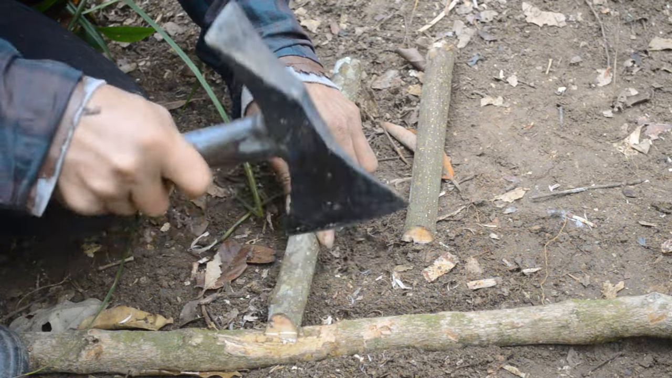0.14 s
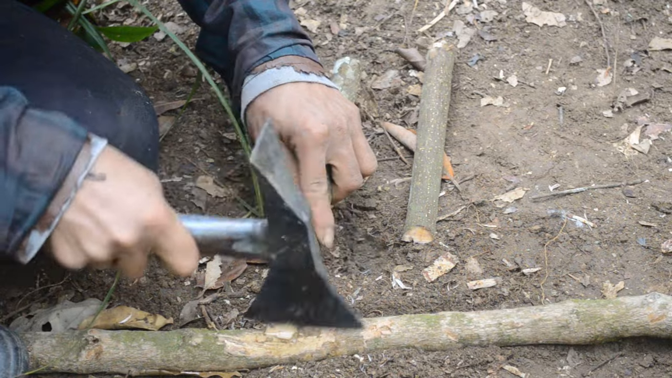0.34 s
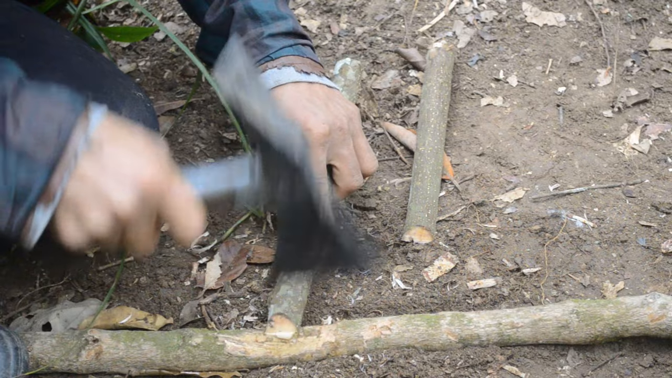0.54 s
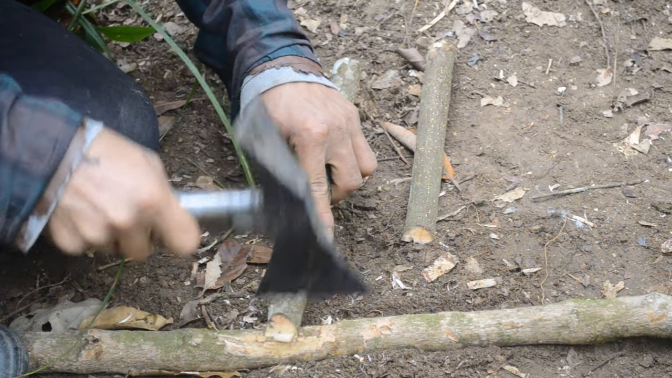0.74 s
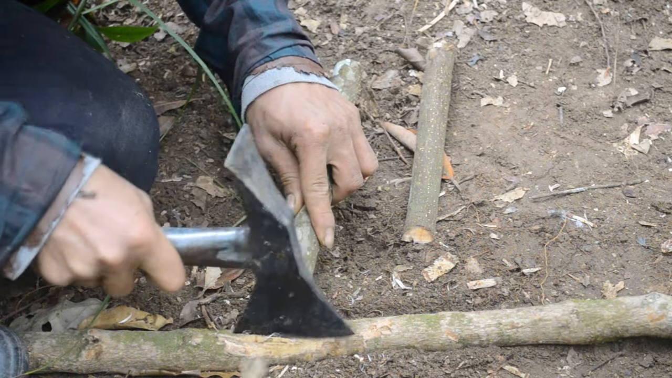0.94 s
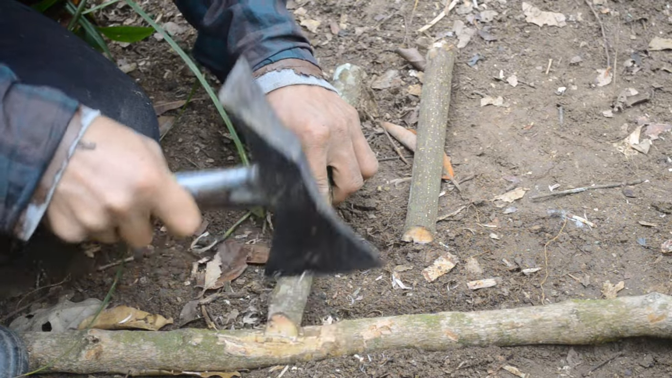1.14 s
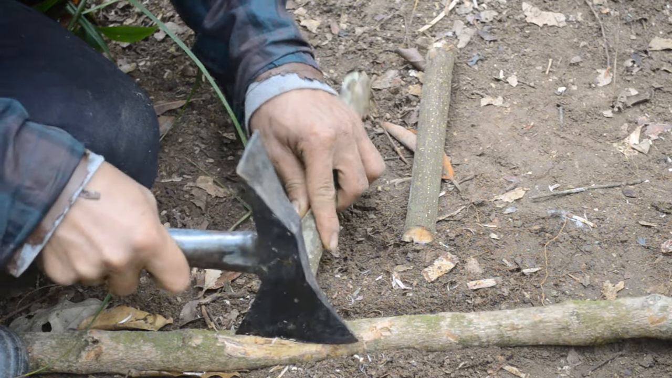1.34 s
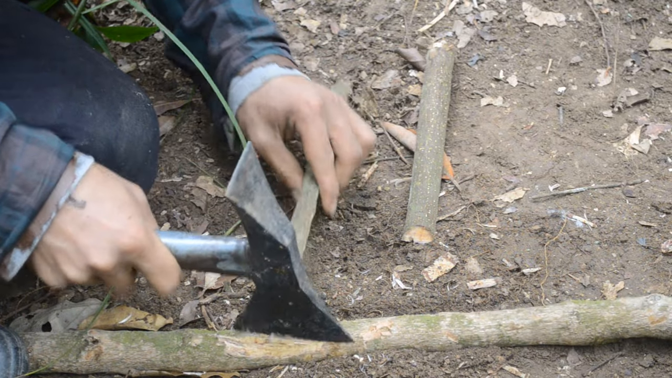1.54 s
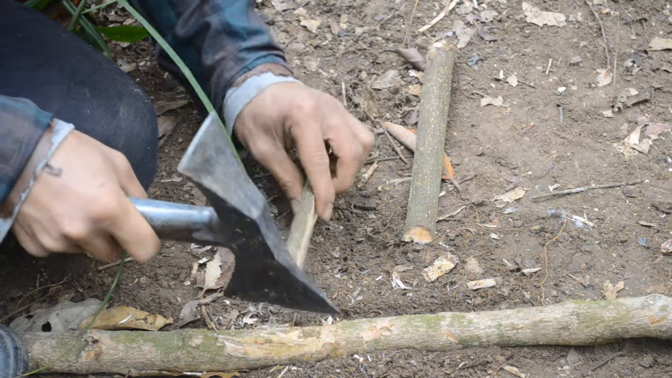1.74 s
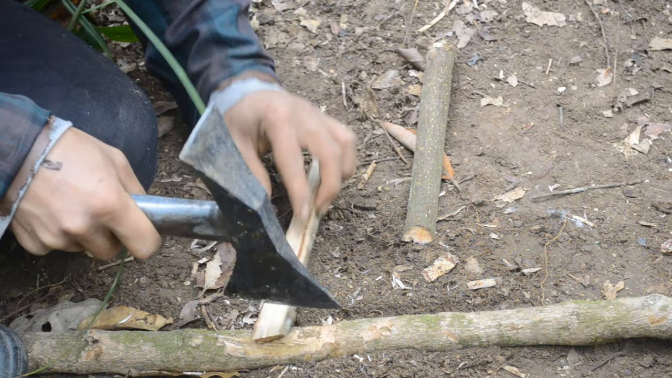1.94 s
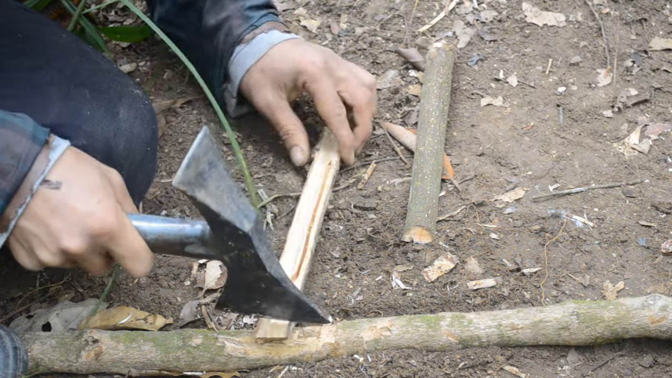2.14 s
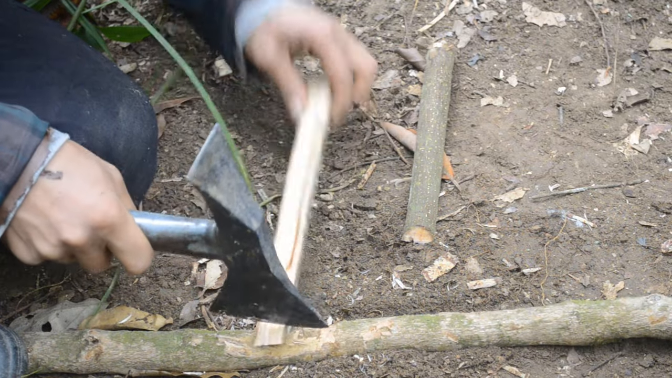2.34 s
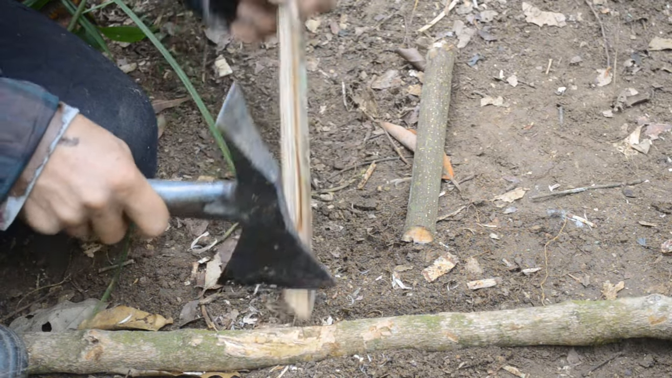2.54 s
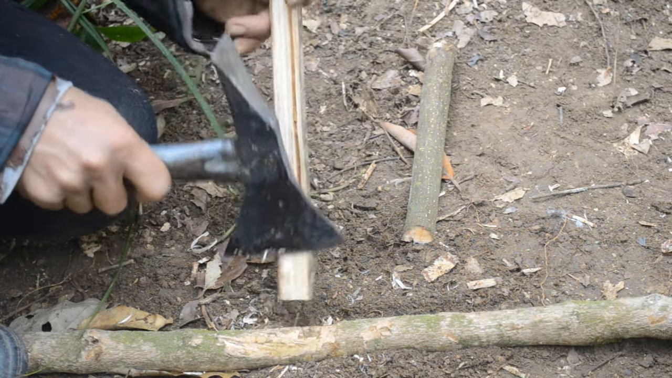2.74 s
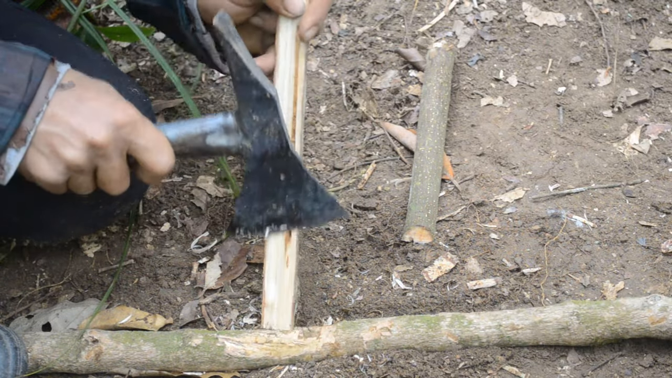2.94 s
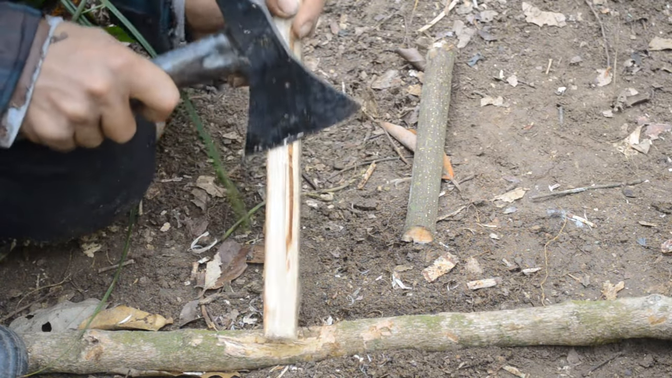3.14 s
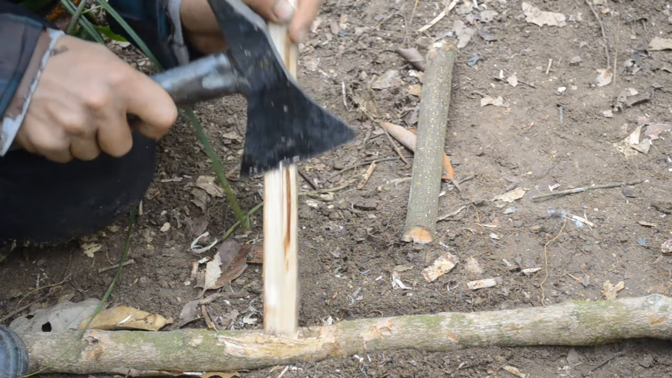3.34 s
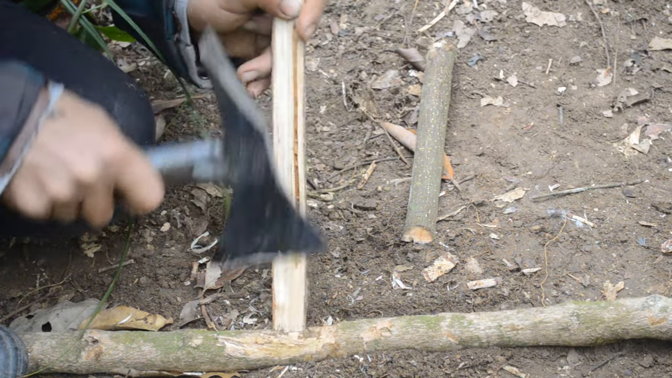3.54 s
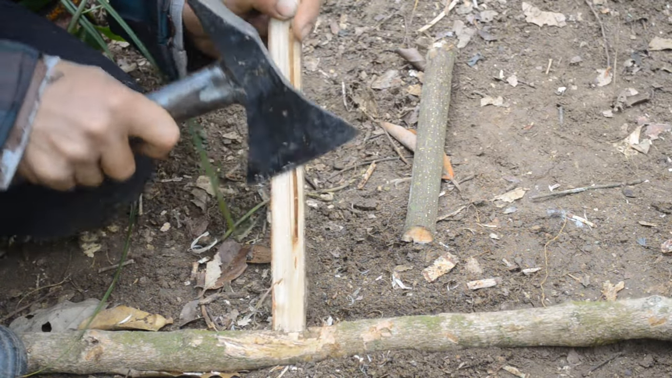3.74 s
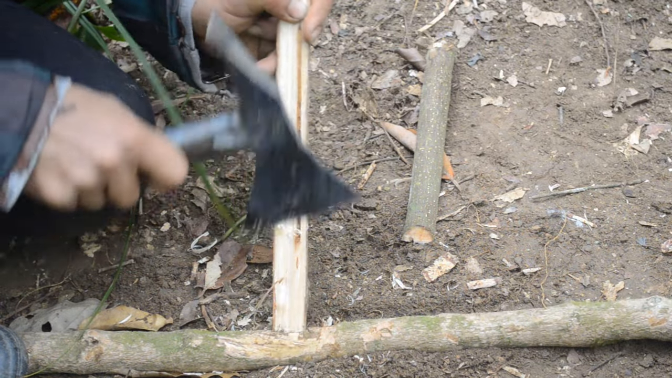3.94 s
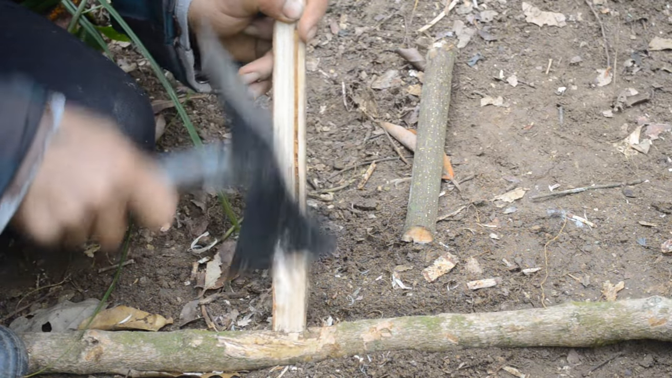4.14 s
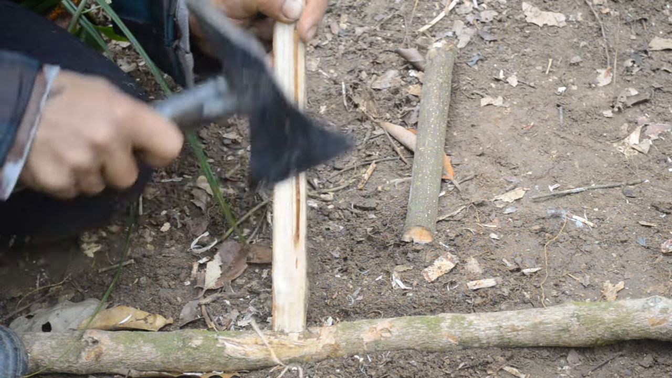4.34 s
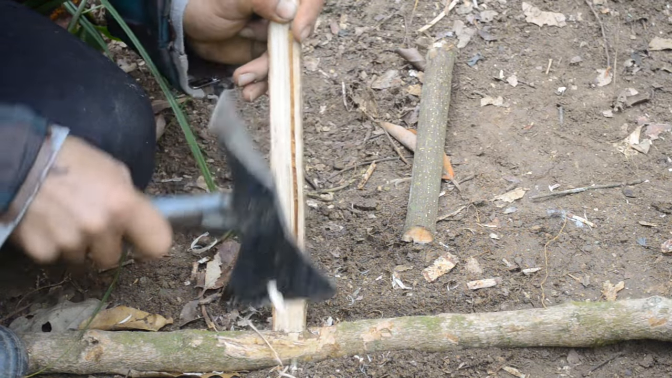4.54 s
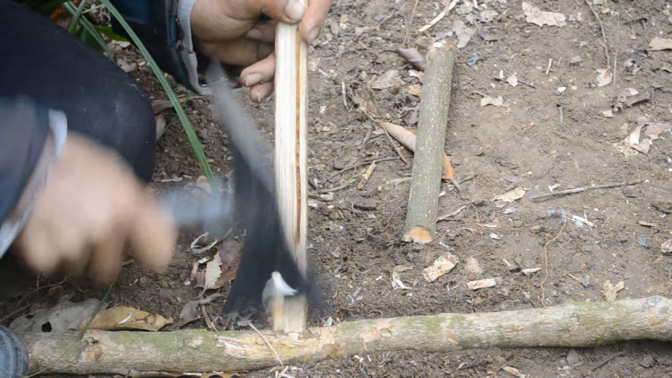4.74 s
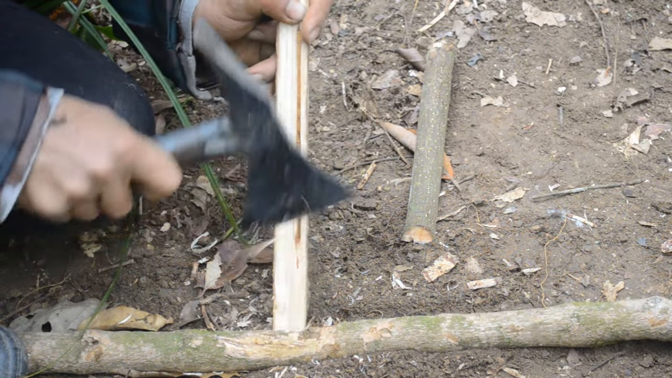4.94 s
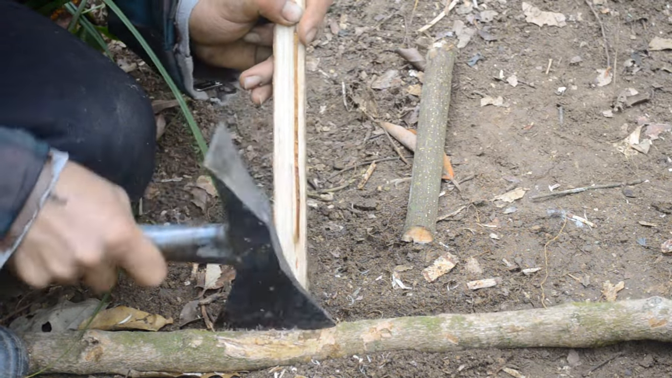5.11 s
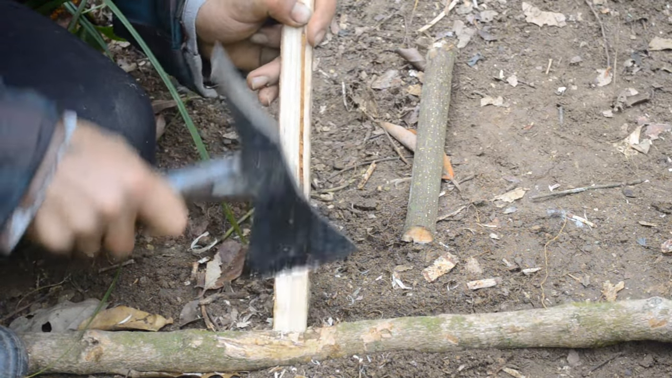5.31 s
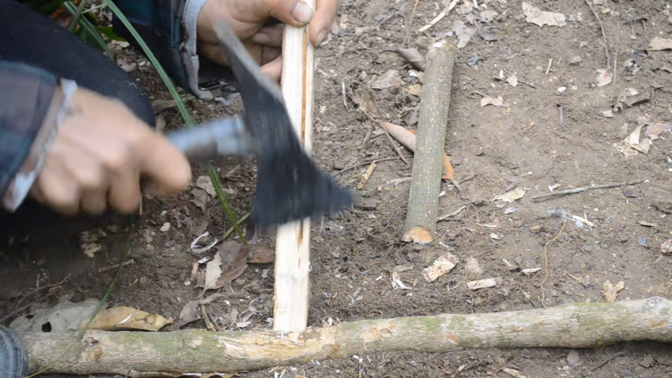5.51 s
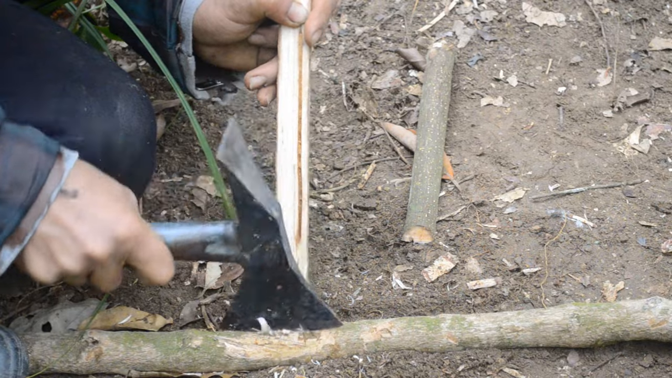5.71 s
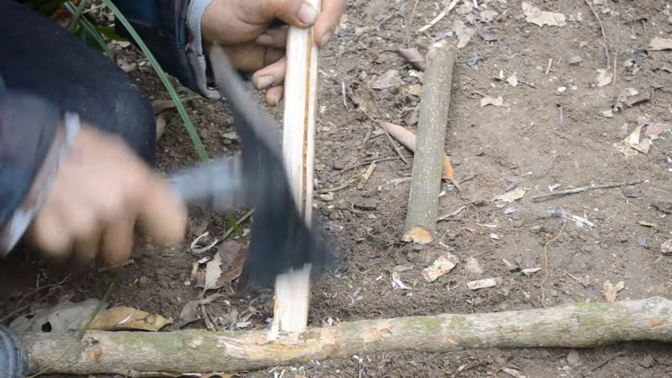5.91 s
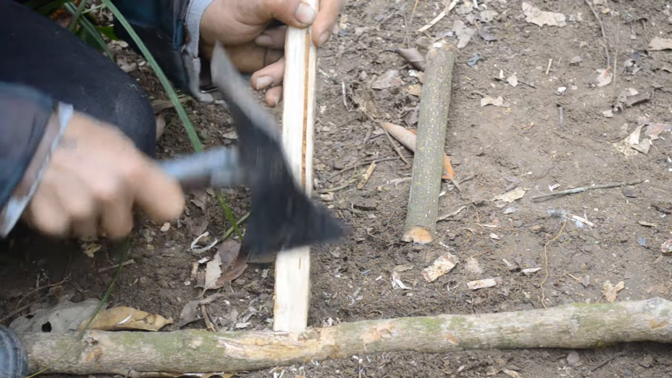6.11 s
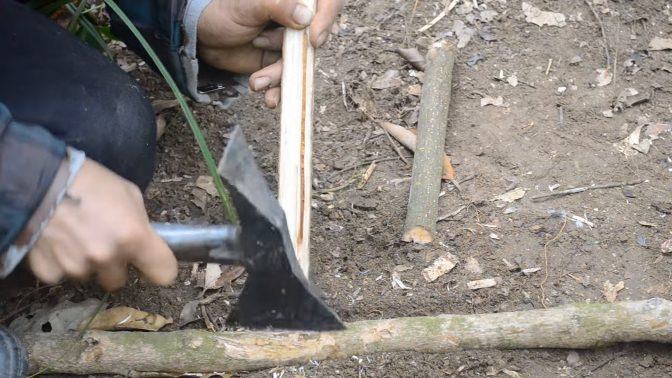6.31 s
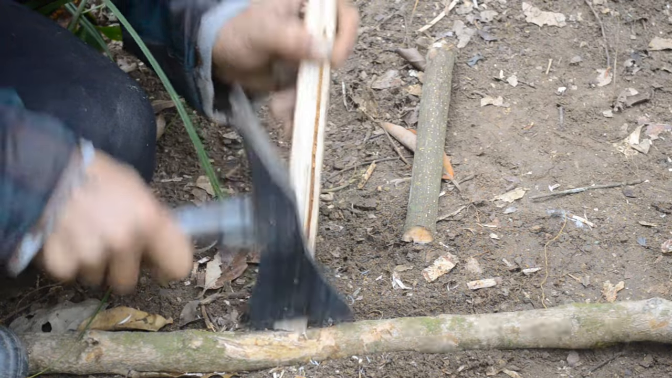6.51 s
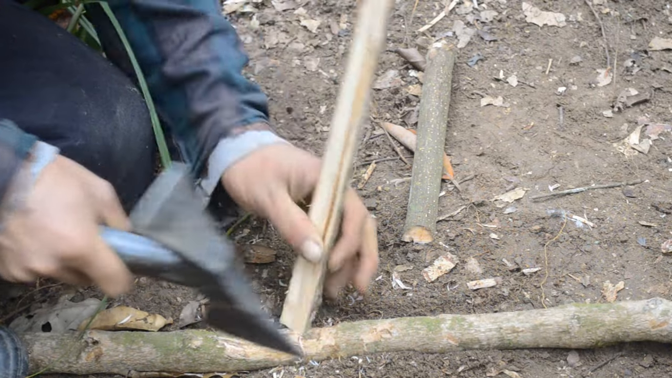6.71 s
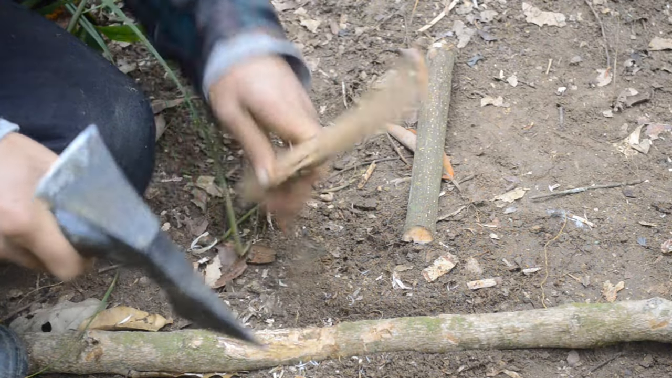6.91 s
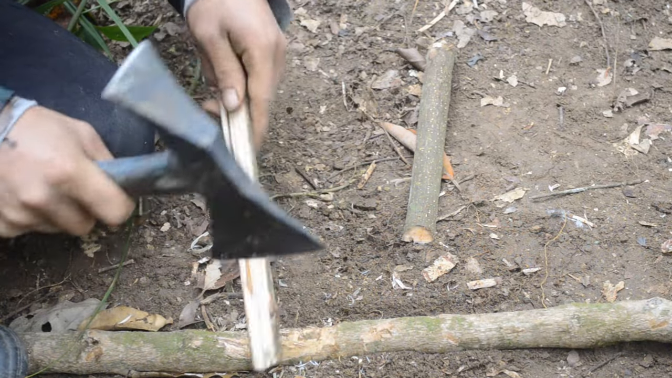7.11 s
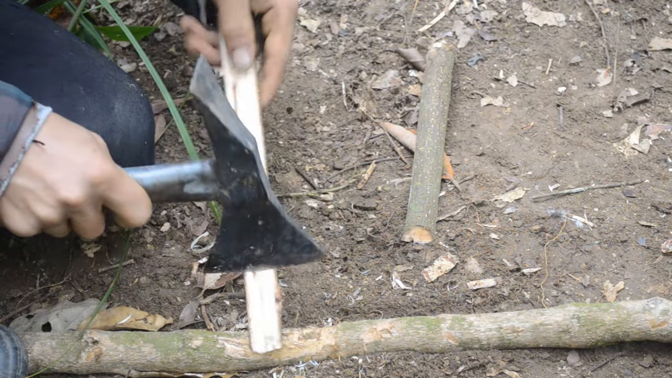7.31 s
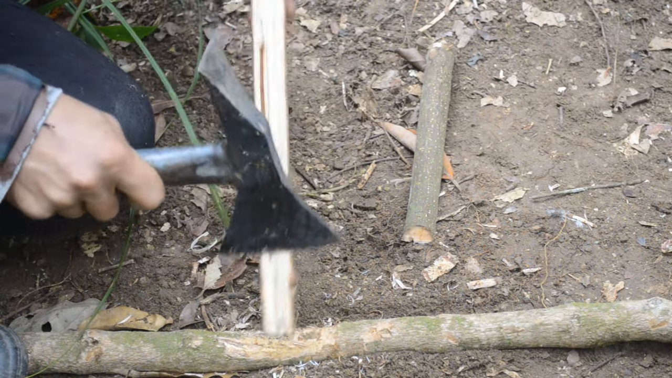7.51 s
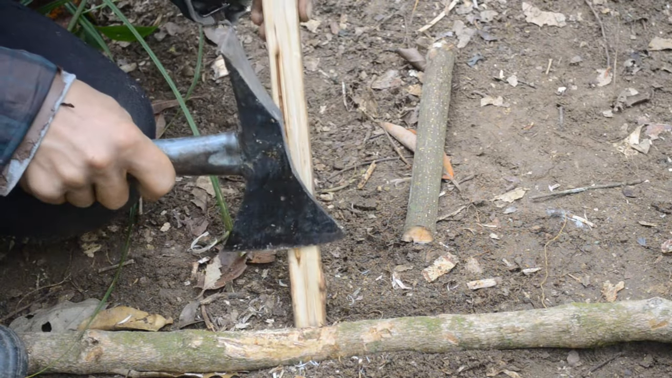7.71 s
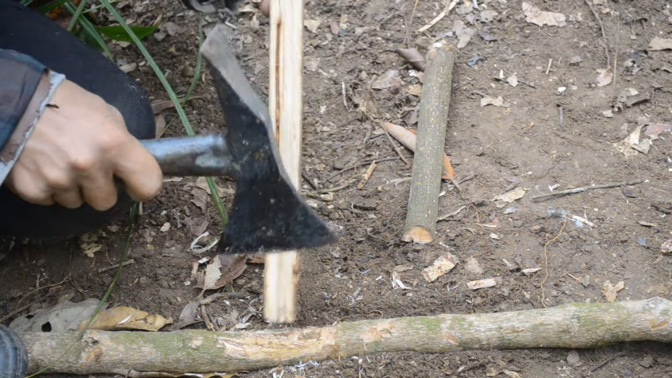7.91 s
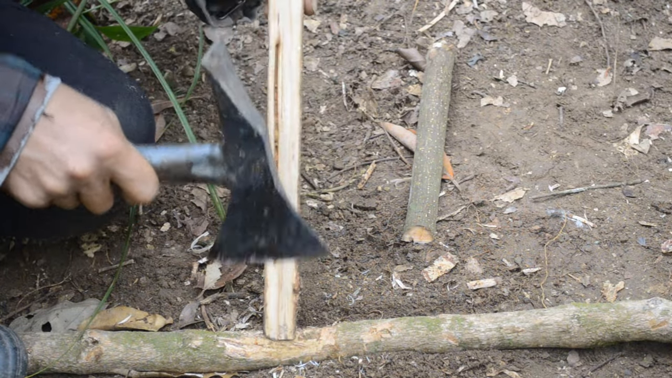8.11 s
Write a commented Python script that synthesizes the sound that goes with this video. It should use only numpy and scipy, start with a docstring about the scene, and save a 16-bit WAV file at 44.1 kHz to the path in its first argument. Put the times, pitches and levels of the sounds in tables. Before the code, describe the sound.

A small hatchet chops a dry stick against a log, then scrapes and shaves it with dull thuds, over faint forest air.

```python
"""A hatchet splits a dry stick against a log with a few close chops, then shaves down it, thuds into the
log and scrapes back up. Each impact crushes wood, shoves the log and excites the hatchet's modes;
stick-slip friction makes the blade sing and the fibres tear. Dry litter snaps, something knocks far
off, and the freed stick buzzes and later clacks on the blade. The trees scatter it all softly,
over forest air, a distant drone and a very faint, high whine."""
import sys
import numpy as np
from scipy import signal
from scipy.fft import rfft, irfft, next_fast_len
from scipy.io import wavfile
from scipy.ndimage import map_coordinates

SR = 44100
rng = np.random.default_rng(int(sys.argv[2]) if len(sys.argv) > 2 else 0)


def pcm_store(signal):
    """Save signal as 16-bit PCM."""
    levels = np.round(np.clip(np.atleast_2d(signal), -1, 1) * 32767)
    wavfile.write(sys.argv[1], SR, levels.astype(np.int16).T)


N = 359856
T = np.arange(SR // 2) / SR  # seconds within one event
TIME = np.arange(N) / SR  # seconds within the scene


def amp(db):
    """Decibels to amplitude."""
    return 10 ** (np.asarray(db) / 20)


def unit(x):
    """Scale to rms 1."""
    return x / np.sqrt(np.mean(x ** 2) + 1e-20)


def along(points, hz):
    """Interpolate (Hz, value) points on a log frequency axis."""
    f, v = np.transpose(points)
    return np.interp(np.log(hz + 1), np.log(f + 1), v)


def add(track, s, sound):
    """Superpose a sound on the track at s seconds."""
    start = round(s * SR)
    part = sound[max(-start, 0):N - start]
    track[max(start, 0):][:len(part)] += part


def wobble(rate):
    """Smooth random modulation, with rate knots a second."""
    return map_coordinates(rng.standard_normal(int(N * rate / SR) + 4), [TIME * rate])


def filtered(x, response):
    """Linear filtering: multiply the spectrum by a frequency response."""
    size = 2 * next_fast_len(len(x) // 2 + 4096)
    return irfft(rfft(x, size) * response(np.fft.rfftfreq(size, 1 / SR)), size)[:len(x)]


def coloured(x, points):
    """Minimum-phase filtering to a (Hz, dB) shape."""
    def response(hz):
        cepstrum = irfft(np.log(amp(along(points, hz))))
        half = len(cepstrum) // 2
        return np.exp(rfft(np.r_[cepstrum[0], 2 * cepstrum[1:half], np.zeros(half)]))
    return filtered(x, response)


def resonant(modes):
    """Forced resonance: noise drives (Hz, width in Hz, dB) modes, at rms 1."""
    def response(f):
        return sum(amp(db) * abs(f * width / (hz * hz - f * f + 1j * f * width)) ** 2
                   for hz, width, db in modes)
    return unit(filtered(rng.standard_normal(N), response))


def blow_sized(x):
    """Scale a transient to the energy of 20 ms at rms 1."""
    return x / np.sqrt(np.sum(x ** 2) / (SR / 50))


def burst(spectrum, t60):
    """Crushed wood fibres radiate exponentially decaying noise."""
    return blow_sized(coloured(rng.standard_normal(len(T)) * amp(-60 * T / t60), spectrum))


def slips(rate, spread_db, smooth):
    """Stick-slip friction: random releases, about rate a second, over a smooth rub."""
    sizes = rng.standard_normal(N) * amp(spread_db * rng.standard_normal(N))
    return unit(sizes * (rng.random(N) < rate / SR)) + smooth * rng.standard_normal(N)


# Each row: start in seconds, then thud, knock and crack levels in dB.
CHOP_BLOWS = [(-0.025, -26.5, -29, -25), (0.3184, -34, -31.5, -28.5), (0.666, -31, -26, -30),
              (1.002, -30.5, -35, -34), (1.332, -30.5, -34, -42.5)]

def chops(split_s=0.00319):
    """Blows with a transit delay: the blade passes through the stick before it meets the log."""
    return [(s, split_s, thud_db, knock_db, crack_db) for s, thud_db, knock_db, crack_db in CHOP_BLOWS]


# The log on soil. Each row: frequency in Hz, gain in dB.
THUD_SPECTRUM = [(25, -35), (50, -24.5), (75, -7.5), (110, 0.5), (180, 1), (260, -5), (400, -6), (700, -14),
                 (1500, -42), (4000, -81.5)]

def thud(push_s=0.00039, rebound_s=0.01084, rebound=0.25):
    """A force pulse drives the log into the soil; it rebounds once, more softly."""
    def pulse(onset, width):
        t = np.maximum(T - onset, 0)
        return t / width ** 2 * np.exp(-t / width)
    force = pulse(.0006, push_s / 2) + rebound * pulse(rebound_s, push_s)
    return blow_sized(coloured(force, THUD_SPECTRUM))


# Wood knocking, cracking and splintering. Each row: frequency in Hz, gain in dB.
KNOCK_SPECTRUM = [(120, -40), (350, -0.5), (620, 1), (900, -3.5), (1200, -8), (1430, -3.5), (1800, -15),
                  (4000, -54)]
CRACK_SPECTRUM = [(900, -30.5), (1700, -2), (2000, 0), (2650, 0.5), (3350, 2), (3750, 0.5), (4200, -13.5),
                  (7000, -37)]
SPLINTER_SPECTRUM = [(2500, -2), (4300, 3), (5500, 1.5), (7900, 2), (9500, -6.5), (11500, -3),
                     (15500, -15.5)]
# The steel head wedged in wood. Each row: frequency in Hz, width in Hz, level in dB.
HEAD_MODES = [(2046, 360, -1.5), (3310, 335, 1), (4740, 300, -15), (6470, 412, -22.5), (8050, 440, -14.5),
              (11170, 400, -23.5), (12400, 450, -23)]

def impacts(blows, crush_t60=0.024, head_t60=0.27, head_db=-23, ring_hz=281, ring_t60=0.25, firm_db=-41):
    """Impact excitation: each blow crushes wood and rings the head and the hatchet's low bending mode."""
    out, steel = np.zeros(N), resonant(HEAD_MODES)
    for s, thud_delay_s, thud_db, knock_db, crack_db in blows:
        knock = amp(knock_db) * burst(KNOCK_SPECTRUM, 1.37 * crush_t60)
        crack = amp(crack_db) * burst(CRACK_SPECTRUM, crush_t60)
        splinters = amp(crack_db - 13.5) * burst(SPLINTER_SPECTRUM, 1.4 * crush_t60)
        head = amp(crack_db + head_db - 60 * T / head_t60) * np.roll(steel, rng.integers(N))[:len(T)]
        ring_db = thud_db - 8.5 - 0.72 * max(firm_db - thud_db, 0)  # light blows hardly wake the mode
        ring_envelope = amp(ring_db - 60 * T / ring_t60) * (1 - np.exp(-T / .003))
        ring = ring_envelope * np.sin(2 * np.pi * ring_hz * T)
        add(out, s, knock + crack + splinters + head)
        add(out, s + thud_delay_s, amp(thud_db) * thud() - ring)
    return out


# Decay among the trees. Each row: frequency in Hz, reverberation time in seconds.
FOREST_DECAY = [(100, 0.14), (500, 0.23), (2000, 0.22), (6000, 0.26), (14000, 0.22)]

def forest(x):
    """Scattering by trunks and leaves gives a faint diffuse tail, drawn anew three times a second."""
    out, step = np.zeros(N), SR // 3
    for start in range(0, N, step):
        hz, t, spectra = signal.stft(rng.standard_normal(SR // 2), SR, nperseg=256)
        decay = amp(-60 * t / along(FOREST_DECAY, hz)[:, None])
        tail = signal.istft(spectra * decay, SR)[1][:len(T)] * (1 - np.exp(-T / 0.003))
        add(out, start / SR, signal.fftconvolve(x[start:start + step], tail / np.linalg.norm(tail)))
    return coloured(out, [(80, -19.5), (250, -21.0), (600, -28.5), (1500, -22), (3400, -23.5),
                          (8000, -20.5), (14000, -20.5)])


# Forest air. Each row: frequency in Hz, gain in dB.
AIR_SPECTRUM = [(20, -20), (60, -18), (130, -10), (300, -12), (550, -8.5), (800, -10.5), (1200, -10),
                (1550, -12), (2500, -19), (4000, -26.5), (8000, -37.5), (15000, -40)]

def background(air_db=-65, drone_hz=980, drone_db=-72, whine_hz=15665, whine_db=-93):
    """Superposition of broadband air, a distant narrowband drone and a pure-tone whine."""
    air_gain = amp(air_db + 0.25 * wobble(2.2) + 0.448 * wobble(7.7))
    air = air_gain * unit(coloured(rng.standard_normal(N), AIR_SPECTRUM))
    drone = amp(drone_db + 1.2 * wobble(2.84)) * resonant([(drone_hz, 76, 0)])
    whine = amp(whine_db) * np.sqrt(2) * np.sin(2 * np.pi * whine_hz * TIME)
    return air + drone + whine


# Chips and dry leaves. Each row: start in seconds, level in dB before the offset snap_db.
LITTER_SNAPS = [(0.134, -61), (1.225, -63), (1.4163, -52.5), (2.396, -60.5), (2.459, -62), (2.6673, -54.5),
                (3.374, -57), (4.8414, -38.5), (5.0194, -57), (5.0327, -52.5), (6.6453, -56.5)]

def litter(snap_db=-19, settle_db=-69):
    """Brittle fracture: dry bits snap, and a faint crackle swells as the last shavings settle."""
    out = np.zeros(N)
    for s, db in LITTER_SNAPS:
        snap = burst(SPLINTER_SPECTRUM, 0.024) + 2.4 * burst(CRACK_SPECTRUM, 0.031)
        add(out, s, amp(db + snap_db) * snap)
    settling = np.interp(TIME, [6.6, 6.63, 6.73, 6.81, 6.9], [0.027, 0.47, 0.19, 0.26, 0.018])
    crackle = unit(coloured(slips(1500, 3.8, 0.44), SPLINTER_SPECTRUM))
    return out + amp(settle_db) * settling * crackle


# Each row: start in seconds, thud level in dB, crack level in dB.
HANDLING_BUMPS = [(1.914, -58.5, -69.5), (1.962, -57.5, -71), (2.13, -53, -59), (2.918, -49, -70.5),
                  (2.931, -56.5, -70), (3.278, -57.5, -65), (8.062, -60, -83)]

def bumps(knock_lift_db=4):
    """Blows from light collisions of stick and blade as they are handled."""
    return [(s, 0, thud_db, (thud_db + crack_db) / 2 + knock_lift_db, crack_db)
            for s, thud_db, crack_db in HANDLING_BUMPS]


def far_knock(s=2.017, db=-55, echo_db=-3):
    """Reverberation in the trees prolongs a dull, hollow knock some way off."""
    out, hollow = np.zeros(N), [(300, -37), (600, 9), (780, 5), (1050, 6), (1500, -16), (4000, -47)]
    add(out, s, amp(db) * (burst(hollow, t60=0.12) + amp(echo_db) * burst(hollow, t60=0.99)))
    return out


# Each row: middle in seconds, level in dB, bite from 0 (gliding) to 1 (cutting).
BLADE_GLIDES = [(3.13, -65.5, 0.4), (3.37, -69, 0.3), (3.595, -55, 0.76), (3.765, -61.5, 0.26),
                (4.085, -66, 0.76), (4.205, -55, 0.7), (4.375, -55, 0.45), (4.685, -59.5, 0.3),
                (4.976, -52.5, 0.22), (5.27, -53.5, 0.36), (5.595, -63.5, 0.3), (5.72, -59.5, 0.5),
                (5.883, -53, 0.48), (6.16, -56, 0.44), (6.483, -54, 0.21)]

def glides(rise_s=0.067, hold_s=0.026, fall_s=0.07):
    """Strokes of light sliding friction: the blade leans on, slides and lifts off."""
    return [(s - hold_s / 2, rise_s, hold_s, fall_s, db, bite) for s, db, bite in BLADE_GLIDES]


# The rubbed blade's main and upper modes. Each row: frequency in Hz, width in Hz, level in dB.
BLADE_MODES = [(1450, 400, -18), (1940, 140, -15), (2700, 400, -18), (3200, 100, 0), (3480, 350, -20),
               (3950, 200, -23)]
SHEEN_MODES = [(4620, 250, -7), (6460, 200, 0), (6900, 300, -8), (7590, 280, 0), (11360, 260, -4),
               (12500, 260, -2)]

def shaving(strokes, swell=1.77, steel_db=-1.5, sheen_db=-16, fibre_db=-1.5, snap_db=-10):
    """Frictional excitation: a gliding edge sings in the steel; a biting edge tears and snaps fibres."""
    gliding, cutting = np.zeros(N), np.zeros(N)
    for s, rise, hold, fall, db, bite in strokes:
        pressure = amp(db) * np.interp(TIME - s, [-rise, 0, hold, hold + fall], [0, 1, 1, 0]) ** swell
        cutting_share = np.clip(bite, 0, .85)
        gliding += pressure * np.sqrt(1 - cutting_share)
        cutting += pressure * np.sqrt(cutting_share)
    chatter = amp(3 * wobble(110))  # the edge catches on the grain
    steel = amp(steel_db + 3 * wobble(60)) * resonant(BLADE_MODES)
    sheen = amp(sheen_db + 5 * wobble(25)) * resonant(SHEEN_MODES)
    return gliding * steel + cutting * (sheen + chatter * tearing(fibre_db, snap_db))


# Tearing wood fibres. Each row: frequency in Hz, gain in dB.
FIBRE_SPECTRUM = [(50, -17.5), (160, 7.5), (380, -2), (700, 4.5), (1400, 0), (2000, -6.5), (3300, -2),
                  (4300, -15.5), (5500, -22), (7900, -17.5), (9200, -23), (12500, -28), (15500, -31)]

def tearing(fibre_db, snap_db):
    """Fracture in small steps: dense releases of fibres mixed with sparser single snaps."""
    snap_spectrum = [(200, -8), (1400, 2), (3000, 1), (4500, -37), (9000, -42)]
    fibres = unit(coloured(slips(3000, 2.9, 0.85), FIBRE_SPECTRUM))
    snaps = unit(coloured(slips(400, 3.3, 0), snap_spectrum))
    return amp(fibre_db) * fibres + amp(snap_db) * snaps


# Each row: landing time in seconds, then scrape, thud and knock levels in dB.
DOWNWARD_CUTS = [(3.895, -52, -57.5, -62.5), (4.267, -55, -54.5, -71), (4.542, -48.5, -46.5, -45.5),
                 (4.851, -45, -32.5, -43.5), (5.1442, -48, -30.5, -36.5), (5.409, -55.5, -60, -72),
                 (5.766, -49, -39.5, -47), (6.034, -47.5, -32.5, -37.5), (6.3313, -49.5, -33.5, -37),
                 (6.6116, -53, -34.5, -38)]

def cuts(rise_s=0.068, hold_s=0.013, stop_s=0.0091, bite=0.62):
    """Shearing strokes: pressure builds down the stick until a blow on the log stops the blade."""
    strokes = [(s - hold_s, rise_s, hold_s, stop_s, db, bite) for s, db, _, _ in DOWNWARD_CUTS]
    blows = [(s, 0, thud_db, knock_db, knock_db - 9.5) for s, _, thud_db, knock_db in DOWNWARD_CUTS]
    return strokes, blows


# Each row: start in seconds, crack level in dB, tearing level in dB.
GRAIN_CATCHES = [(4.165, -66, -63), (4.221, -59.5, -43), (4.486, -68, -59), (4.651, -73, -63),
                 (5.7232, -47, -45.5), (6.003, -59, -58), (6.183, -63, -55)]

def catches(tear_s=0.027, bite=0.37):
    """Stress release: the edge catches in the grain with a small blow and tears on in a short stroke."""
    strokes = [(s, .002, .002, tear_s, db, bite) for s, _, db in GRAIN_CATCHES]
    blows = [(s, 0, db - 8.5, db - 5.5, crack_db) for s, crack_db, db in GRAIN_CATCHES]
    return strokes, blows


# The loosely held split stick. Each row: frequency in Hz, level in dB, 60 dB decay time in seconds.
STICK_MODES = [(800, -11, .025), (1034, -5, .03), (1720, -3, .02), (1975, -3, .045), (2830, -14, .04),
               (3320, 0, .022)]

def stick(buzz_s=6.619, buzz_hz=1430, buzz_db=-36, buzz_t60=.04, clack_s=7.387, ring_db=-38):
    """Free vibration: the stick buzzes as the last cut frees it, then rings when knocked on the blade."""
    out, attack = np.zeros(N), 1 - np.exp(-T / .0003)
    add(out, buzz_s, amp(buzz_db - 60 * T / buzz_t60) * attack * np.sin(2 * np.pi * buzz_hz * T))
    ring = sum(amp(db + rng.normal(0, 1) - 60 * T / t60) * np.sin(2 * np.pi * hz * T)
               for hz, db, t60 in STICK_MODES)
    contact = amp(-50) * burst(KNOCK_SPECTRUM, 0.033) + amp(-72) * burst(SPLINTER_SPECTRUM, 0.028)
    add(out, clack_s, amp(ring_db) * attack * ring + contact)
    return out


def scene():
    """Superposition of the direct sound of the work, its reverberation and the forest around it."""
    cut_strokes, cut_blows = cuts()
    catch_strokes, catch_blows = catches()
    work = impacts(chops() + cut_blows + catch_blows + bumps()) + stick()
    work += shaving(cut_strokes + catch_strokes + glides()) + litter()
    return (work + forest(work) + far_knock() + background())[None]


def record(dry, top_hz=15850):
    """Band limiting: an ideal low-pass filter keeps nothing above top_hz."""
    return np.array([filtered(channel, lambda hz: hz < top_hz) for channel in dry])


dry = scene()
out = record(dry)
pcm_store(out)
```